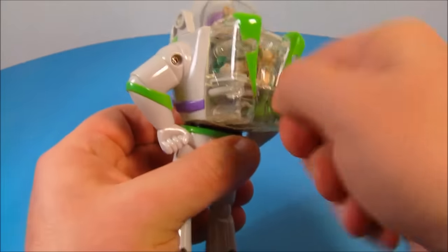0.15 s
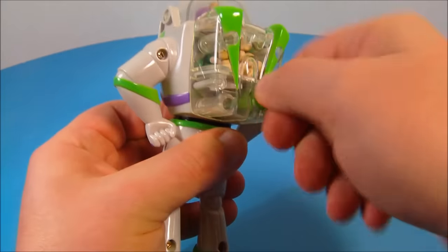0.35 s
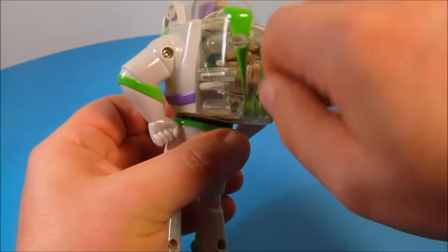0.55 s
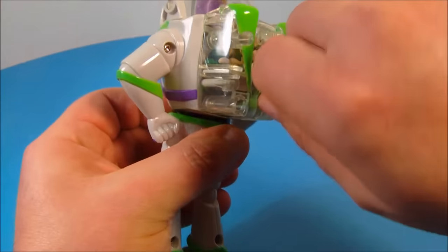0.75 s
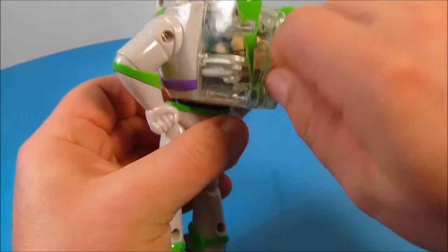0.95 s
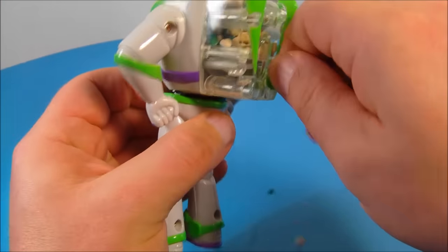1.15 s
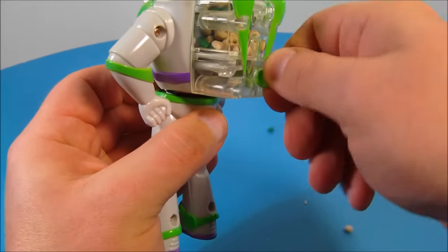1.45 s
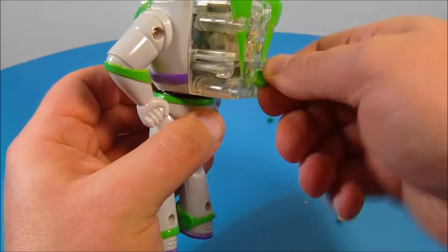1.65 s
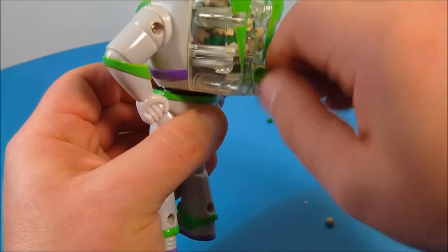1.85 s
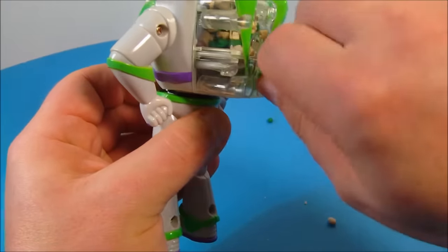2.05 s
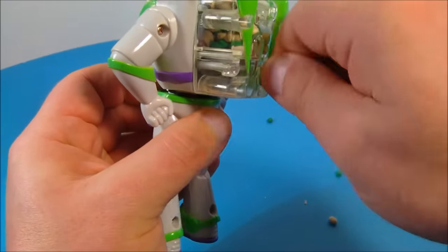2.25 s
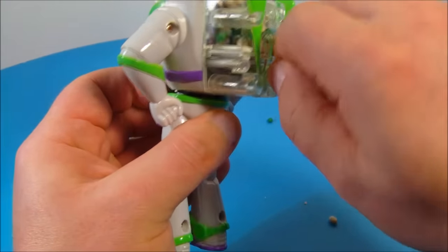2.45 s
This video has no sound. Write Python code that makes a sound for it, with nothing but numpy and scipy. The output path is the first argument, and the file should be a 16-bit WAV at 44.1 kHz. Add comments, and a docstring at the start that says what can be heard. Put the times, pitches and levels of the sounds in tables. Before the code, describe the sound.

A wind-up plastic toy whirrs with a steady, high buzz, close by in a small quiet room. Sharp plastic snaps cut in several times as the dispenser is worked, and small hard candies tick out midway.

```python
"""The clockwork of a wind-up toy candy dispenser whirrs in its plastic shell, close by in a small room.
Impacts of the spring's governor and gears force the shell's modes, faster after the snaps, then sagging.
Sweets tick as they drop out, and each snap of the hand-worked dispenser excites a damped transient.
Faint mains hum and room air lie beneath; a gain control ducks the sound after the loud snaps."""
import sys
import numpy as np
from scipy import signal
from scipy.fft import rfft, irfft, next_fast_len
from scipy.io import wavfile
from scipy.ndimage import uniform_filter1d, minimum_filter1d

SR = 44100
rng = np.random.default_rng(int(sys.argv[2]) if len(sys.argv) > 2 else 0)


def persist_wave(psi):
    """Save psi, clipped to +-1, as 16-bit WAV."""
    counts = np.round(np.clip(psi, -1, 1) * 32767).astype(np.int16)
    wavfile.write(sys.argv[1], SR, np.atleast_2d(counts).T)


N = 114660
T = np.arange(N) / SR
FFT_SIZE = next_fast_len(2 * N)
FREQ = np.maximum(np.arange(FFT_SIZE // 2 + 1) * SR / FFT_SIZE, 1)


def undb(db):
    """Amplitude ratio of a level in decibels."""
    return 10 ** (np.asarray(db) / 20)


def unit(x):
    """Normalisation to unit rms."""
    return x / np.sqrt(np.mean(x ** 2))


def through(x, response):
    """Linear filtering: the spectrum times a frequency response."""
    return irfft(rfft(x, FFT_SIZE) * response, FFT_SIZE)[:N]


def resonance(hz, width):
    """Response of a damped oscillator, gain 1 at resonance."""
    return 1 / (1 + 1j * (FREQ ** 2 - hz ** 2) / (FREQ * width))


def colour(points):
    """Minimum-phase response of unit power, shaped by (f/Hz, level/dB) points."""
    hz, db = np.array(points).T
    magnitude = unit(undb(np.interp(np.log(FREQ), np.log(hz), db)))
    cepstrum = irfft(np.log(magnitude), FFT_SIZE)
    cepstrum[1:FFT_SIZE // 2] *= 2
    cepstrum[FFT_SIZE // 2 + 1:] = 0
    return np.exp(rfft(cepstrum))


def wander(rate):
    """Interpolated noise of unit rms, with `rate` new values a second."""
    hold = int(SR / rate)
    steps = np.repeat(rng.standard_normal(N // hold + 1), hold)
    return unit(uniform_filter1d(steps, hold)[:N])


def impulses(times, sizes):
    """Ideal impacts, one sample each."""
    return np.bincount(np.clip(times * SR, 0, N).astype(int), sizes, N + 1)[:N]


def burst(start, decay, rise=.00029):
    """Transient envelope: exponential rise and decay, time constants in seconds."""
    envelope, alive = np.zeros(N), (T > start) & (T < start + 10 * decay)
    age = T[alive] - start
    envelope[alive] = (1 - np.exp(-age / rise)) * np.exp(-age / decay)
    return envelope


def ping(start, hz, decay):
    """Free vibration of one struck, damped mode."""
    return np.sin(2 * np.pi * hz * (T - start)) * burst(start, decay)


# governor speed: t/s, rotation rate/Hz
GOVERNOR_SPEED = [(0, 234), (.2, 241), (.42, 232), (.6, 220), (.9, 211), (.96, 243), (1.17, 230),
                  (1.3, 213), (1.68, 202), (1.8, 213), (2.05, 223), (2.3, 197), (2.6, 225)]
# knocks within one turn: phase/turns, relative level/dB
GOVERNOR_KNOCKS = [(.05, 5), (.39, 2.5), (0.658, 2)]
def governor_and_gears(jitter_s=.00013, teeth_per_s=4500, scatter_db=3.5, teeth_db=2, flutter_db=.62):
    """Impact excitation: cyclic governor knocks over the random clatter of gear teeth."""
    turns = np.cumsum(np.interp(T, *np.array(GOVERNOR_SPEED).T)) / SR
    whole_turns = np.arange(int(turns[-1]))
    knocks = 0
    for phase, db in GOVERNOR_KNOCKS:
        lateness, polarity = rng.standard_normal((2, len(whole_turns)))
        times = np.interp(whole_turns + phase, turns, T) + jitter_s * lateness
        knocks = knocks + impulses(times, np.sign(polarity) * undb(db))
    strength, polarity = rng.standard_normal((2, N))
    teeth = (rng.random(N) < teeth_per_s / SR) * np.sign(polarity) * undb(scatter_db * strength)
    chatter = unit(unit(knocks) + undb(teeth_db) * unit(teeth))
    return chatter * undb(flutter_db * wander(rate=25))


# the drum settles in a new place: t/s
DRUM_SETTLES = [0, .19, .94, 1.71, 2.49]
def inner_echoes(x, decay_s=.006, echo_db=-9):
    """Interference: reflections inside the shell colour the sound anew at each place of the drum."""
    out, place = 0, np.searchsorted(DRUM_SETTLES, T, side="right") - 1
    for k in range(len(DRUM_SETTLES)):
        echoes = rng.standard_normal(N) * np.exp(-T / decay_s)
        reflected = undb(echo_db) * rfft(echoes / np.linalg.norm(echoes), FFT_SIZE)
        out = out + through(x * (place == k), 1 + reflected)
    return unit(out)


# weaker modes of the shell: f/Hz, bandwidth/Hz, level/dB relative to the broad spectrum
SHELL_MODES = [(819, 16, 1), (935, 31, 2.5), (1224, 18, 0.5), (1481, 40, -0.5), (1718, 44, 0.5),
               (4180, 72, -10.5), (4590, 110, -12.5), (5010, 58, 0), (6444, 126, -3.5), (6910, 100, -9),
               (8240, 250, -4), (9160, 220, -7.5), (11200, 53, -34), (12900, 130, -7)]
def shell(spectrum):
    """Modal superposition: the shell's resonances add to a broad spectrum."""
    modes = sum(undb(db) * resonance(hz, width) for hz, width, db in SHELL_MODES)
    return colour(spectrum) * (1 + modes)


# broad spectrum of the whirr: f/Hz, relative level/dB
WHIRR_SPECTRUM = [(100, -36.5), (400, -35), (600, -26.5), (820, -18), (1200, -15), (2100, -8.5), (2800, -3),
                  (4300, 0), (5600, -1), (7000, -1), (8500, -8.5), (9700, -5.5), (11500, -14),
                  (15300, -19.5)]
# five strongest modes: f/Hz, bandwidth/Hz, skirt width/Hz, gain/dB
STRONG_MODES = [(2906, 116, 710, -2.5), (3118, 210, 1140, -3), (3373, 155, 2900, -3),
                (5150, 140, 2300, -3.5), (5680, 290, 1600, -3)]
# envelopes: t/s, whirr level/dB, then level/dB of each strong mode before its gain
WHIRR_LEVELS = [(0, -25, -41, -59, -44, -36, -32), (0.072, -25.5, -42, -37, -48, -48, -46),
                (.26, -24, -42, -28, -37, -44, -43), (.33, -25, -38, -43, -44, -31, -43),
                (.47, -23, -33, -32, -36, -43, -34), (0.601, -24.5, -31, -26, -41, -43, -39),
                (.73, -26, -38.5, -27.5, -43, -33.5, -33.5), (.9, -25.5, -41, -41, -42, -42, -38),
                (1.02, -25, -32.5, -40, -33, -46, -37), (1.15, -25, -40.5, -44, -32, -42, -29.5),
                (1.3, -24, -30, -48, -35.5, -30, -32), (1.42, -25.5, -37.5, -50, -39, -36, -32),
                (1.66, -26, -38, -47, -41, -38, -46), (1.8, -24.5, -48, -55, -30, -43, -42),
                (1.98, -24.5, -45, -34, -28, -27, -33), (2.15, -26, -39, -39, -32.5, -27.5, -51),
                (2.44, -25.5, -38, -37, -27, -28, -57), (2.6, -22.5, -49, -40, -27.5, -32, -38)]
# upper-middle rasp, growing near the end: t/s, level/dB
RASP_LEVELS = [(0, -46), (1.6, -48), (2.0, -35), (2.3, -29.5), (2.6, -38)]
def clockwork(rasp_hz=4550, rasp_width_hz=1400):
    """Forced vibration: impacts drive the shell, whose strong modes swell and fade as the drum turns."""
    drive = governor_and_gears()
    times, whirr_db, *mode_levels = np.array(WHIRR_LEVELS).T
    whirr = unit(through(inner_echoes(drive), shell(WHIRR_SPECTRUM)))
    out = whirr * undb(np.interp(T, times, whirr_db))
    for (hz, width, skirt, gain_db), levels in zip(STRONG_MODES, mode_levels):
        ring = through(drive, colour(WHIRR_SPECTRUM) * resonance(hz, width) * resonance(hz, skirt))
        out = out + unit(ring) * undb(gain_db + np.interp(T, times, levels))
    rasp = through(drive * rng.choice([-1., 1.], N), resonance(rasp_hz, rasp_width_hz) ** 3)
    return out + unit(rasp) * undb(np.interp(T, *np.array(RASP_LEVELS).T))


# mains harmonics: f/Hz, rms level/dB
MAINS_HARMONICS = [(60, -100), (120, -73.5), (180, -78), (240, -71), (540, -72.5)]
# room air: f/Hz, relative level/dB
AIR_SPECTRUM = [(25, -14), (60, -6), (150, -9), (320, 1.5), (700, -3.5), (3000, -12.5), (15000, -31)]
def hum_and_air(air_db=-66.5):
    """Noise floor: the line spectrum of mains hum over the continuous spectrum of room air."""
    hum = sum(undb(db) * np.sin(2 * np.pi * (hz * T + rng.random())) for hz, db in MAINS_HARMONICS)
    air = unit(through(rng.standard_normal(N), colour(AIR_SPECTRUM)))
    return np.sqrt(2) * hum + undb(air_db) * air


# ticks of sweets and loose parts: t/s, relative level/dB
SWEET_TICKS = [(.0025, -15), (.0042, -16), (.0168, -23), (.025, -31), (0.0333, -19), (0.2716, -20),
               (0.3767, -10), (1.0736, -14), (1.1006, -17.5), (1.154, -15.5), (1.192, -20), (1.1907, -14.5),
               (1.2086, -15), (1.2147, -13.5), (1.219, -15), (1.245, -15), (1.3274, -16.5), (1.339, -15.5)]
# spectrum of a tick: f/Hz, relative level/dB
TICK_SPECTRUM = [(100, -47), (400, -20), (900, -10), (2000, -5.5), (3500, 1.5), (8000, 1.5), (15000, -18.5)]
def sweets(decay_s=.00097, gain_db=1.5):
    """Brief contact gives a broad spectrum: hard sweets tick against the chute and the table."""
    envelope = sum(undb(db) * burst(start, decay_s, rise=1 / SR) for start, db in SWEET_TICKS)
    return undb(gain_db) * through(envelope * rng.standard_normal(N), colour(TICK_SPECTRUM))


# snaps and rebounds, levels relative: t/s, level/dB, crunch decay/s, body f/Hz, body level/dB,
# hollow knock level/dB, crunch tilt/(dB per octave)
DISPENSER_SNAPS = [(.0474, 2, 0.004, 3220, -6.5, -22, -1), (.0601, -3, 0.0013, 7070, -9, -29, 6),
                   (.1770, -6, 0.0027, 3260, -4, -24.5, -0.5), (.1990, -1.5, 0.0029, 4280, -4, -32, -0.5),
                   (.2085, -13, 0.009, 9600, -16, -20.5, 5), (.9313, -5.5, 0.0023, 1705, -1, -23, -0.5),
                   (0.9324, 3.5, 0.0034, 3246, -3.5, -39, -0.5), (0.9401, -5.5, 0.0055, 1460, -9, -38, 1.5),
                   (.9485, -5.5, 0.0015, 5050, -15, -39, 2), (1.7080, 0, 0.0039, 1790, -8, -25.5, 0),
                   (1.7136, -8.5, 0.0098, 6740, -5, -14, 1.5), (2.2488, -6.5, 0.0023, 2630, -7.5, -33, -2),
                   (2.4799, 3, 0.0035, 3400, -6, -27.5, -0.2), (2.4860, -2.5, 0.0023, 6600, -3.5, -29, 4),
                   (2.4931, -9.5, 0.0057, 1480, -10, -29, -1.5), (2.5042, -9.5, 0.0038, 6040, -9, -36, 2.5)]
# broad spectrum of the crunch: f/Hz, relative level/dB
CRUNCH_SPECTRUM = [(60, -55), (300, -23), (550, -26.5), (800, -15.5), (1100, -9.5), (1600, -1.5),
                   (2200, -4.5), (3200, 3), (6200, 1), (9000, -2), (12000, -9.5), (15300, -17.5)]
def dispenser(gain_db=-1.5, hollow_hz=825, low_cut_hz=300):
    """Impulse response: plastic snaps on plastic with a crunch, a damped body ring and a hollow knock."""
    out, casing = 0, shell(CRUNCH_SPECTRUM)
    for start, db, decay, body_hz, body_db, hollow_db, tilt_db in DISPENSER_SNAPS:
        tilt = undb(tilt_db * np.log2(np.maximum(FREQ, 500) / 4500))
        crunch = unit(through(rng.choice([-1., 1.], N), casing * tilt)) * burst(start, decay)
        body = undb(body_db) * ping(start, body_hz, decay=.002)
        hollow = undb(hollow_db) * ping(start, hollow_hz, decay=.0046)
        out = out + undb(gain_db + db) * (crunch + 2 * (body + hollow))
    high_pass = 1 - 1 / (1 + 1j * FREQ / low_cut_hz)
    return through(out, high_pass ** 3)


# soft bumps: t/s, f/Hz, level/dB
SOFT_BUMPS = [(.862, 410, -56), (1.213, 620, -44), (1.243, 640, -43), (1.985, 330, -47)]
def bumps():
    """Damped oscillation: each soft bump of handling or of a landing sweet rings one low mode."""
    return sum(undb(db) * ping(start, hz, decay=.009) for start, hz, db in SOFT_BUMPS)


def room(x, t60_s=.066, level_db=-16.5):
    """Reverberation: convolution with a diffuse, exponentially decaying tail."""
    tail = rng.standard_normal(N) * burst(start=.0037, decay=t60_s / np.log(1000), rise=.0011)
    return undb(level_db) * through(x, rfft(tail / np.linalg.norm(tail), FFT_SIZE))


def scene():
    """Superposition of toy, reverberation and noise floor, the same in both ears."""
    toy = clockwork() + sweets() + dispenser() + bumps()
    return np.tile(toy + room(toy) + hum_and_air(), (2, 1))


def record(dry, notch_hz=7895, threshold_db=-8.5, release_s=.16, ceiling=.97, top_hz=15200):
    """Dynamic compression: a notch, fast-attack slow-release gain control, a limiter, a steep top cut."""
    x = through(dry[0], 1 - resonance(notch_hz, width=200))
    rms = np.sqrt(np.abs(uniform_filter1d(x ** 2, size=128)) + 1e-12)
    excess_db = np.maximum(20 * np.log10(rms) - threshold_db, 0)
    release = np.exp(-T / release_s)
    duck_db = np.maximum.accumulate(excess_db / release) * release  # decaying peak hold
    x = x * undb(-uniform_filter1d(duck_db, size=160))
    limiter_gain = minimum_filter1d(ceiling / np.maximum(np.abs(x), ceiling), size=48)
    x = x * uniform_filter1d(limiter_gain, size=48)
    low_pass = signal.ellip(8, .1, 60, top_hz, fs=SR, output="sos")
    return np.tile(signal.sosfiltfilt(low_pass, x), (2, 1))


dry = scene()
out = record(dry)
persist_wave(out)
```